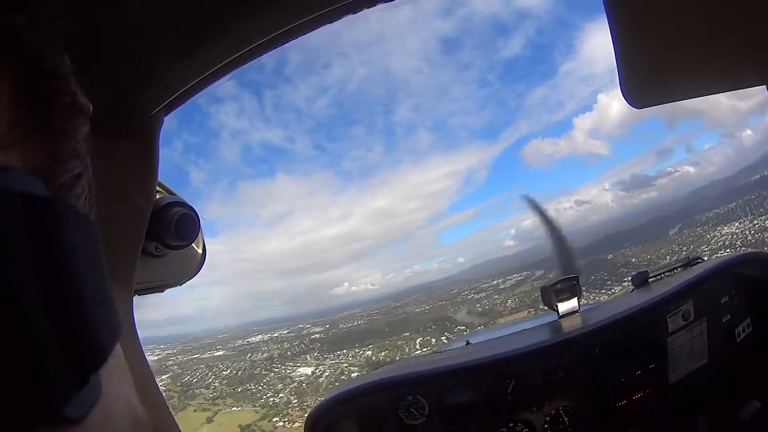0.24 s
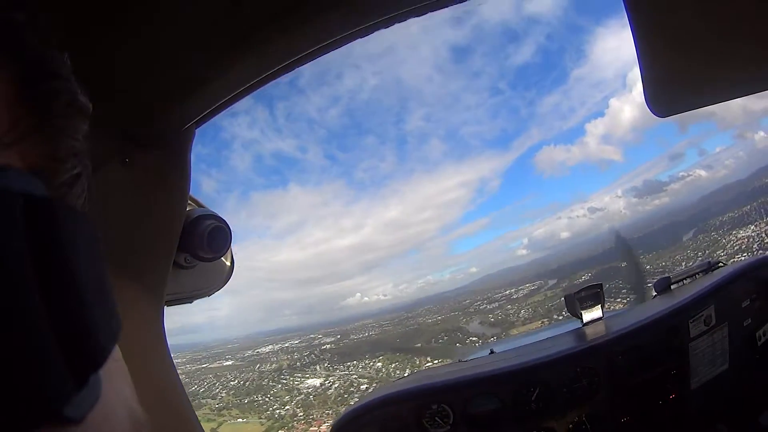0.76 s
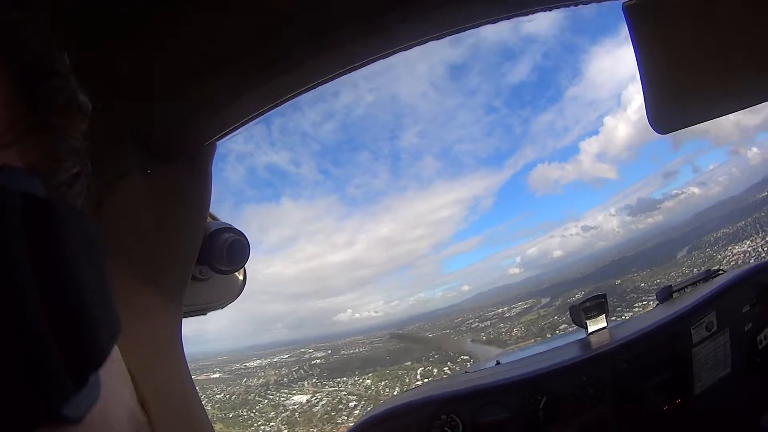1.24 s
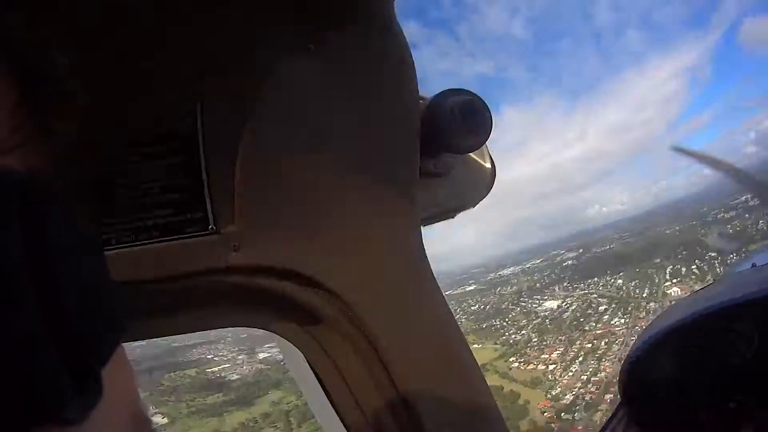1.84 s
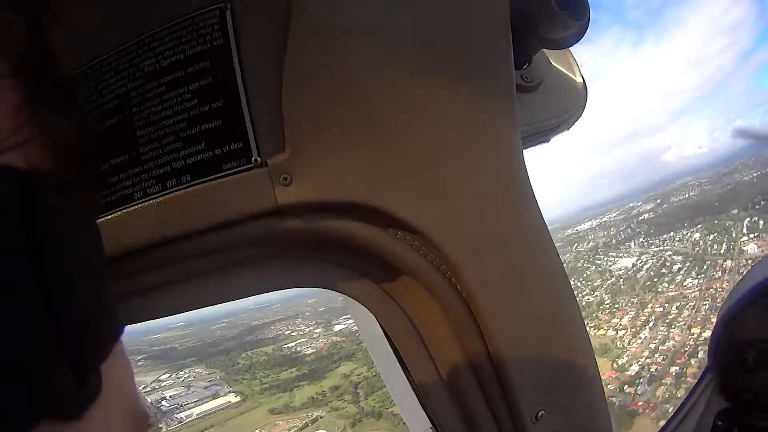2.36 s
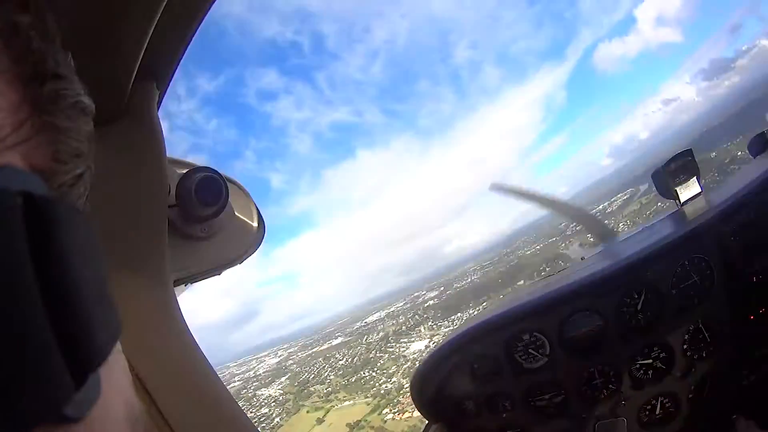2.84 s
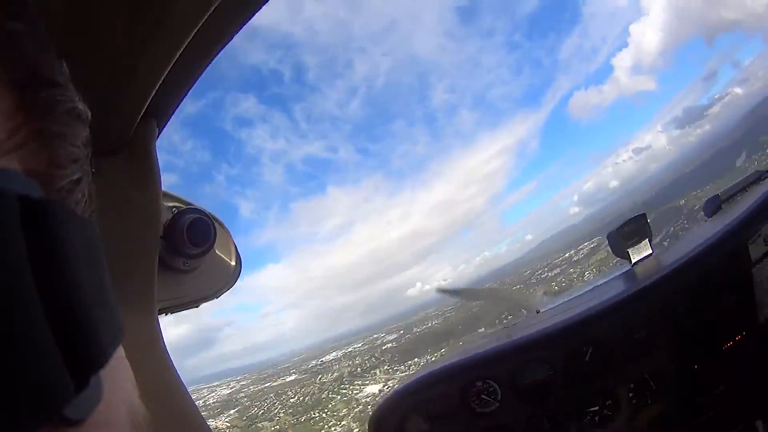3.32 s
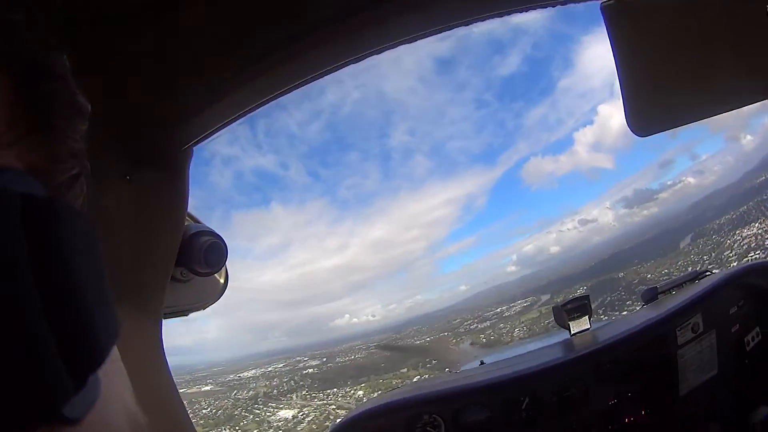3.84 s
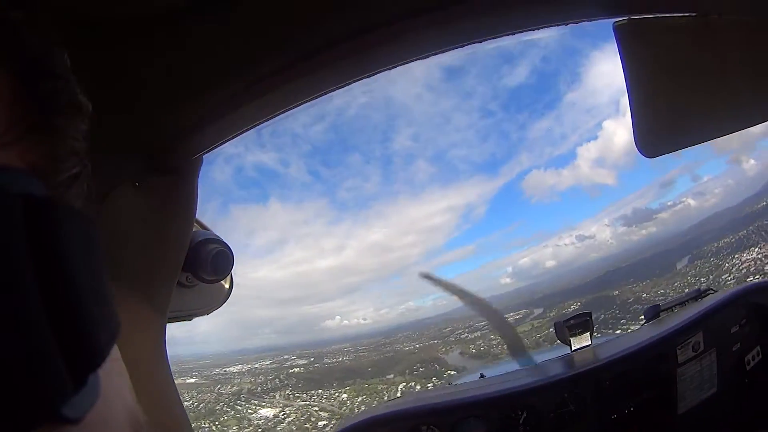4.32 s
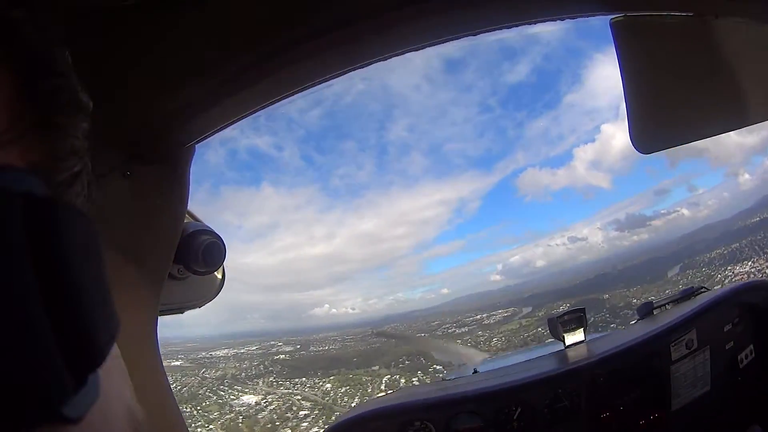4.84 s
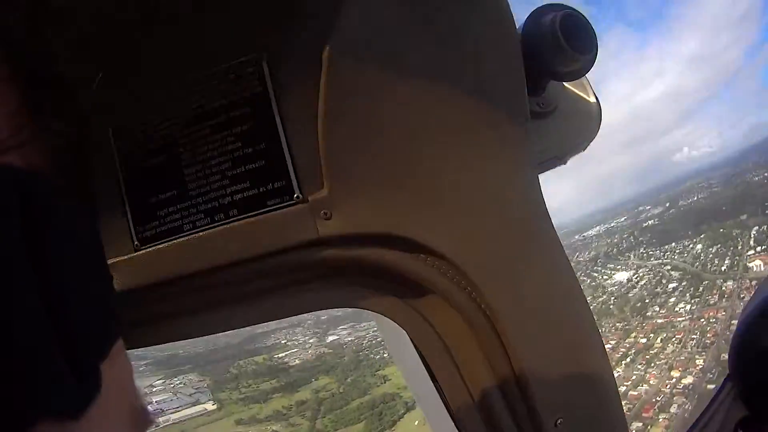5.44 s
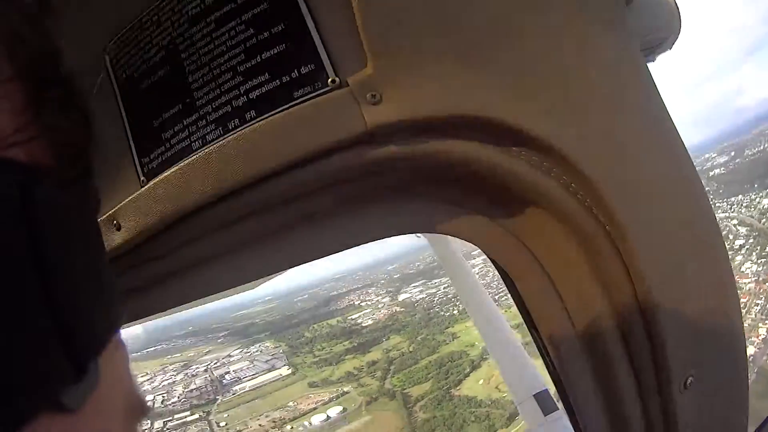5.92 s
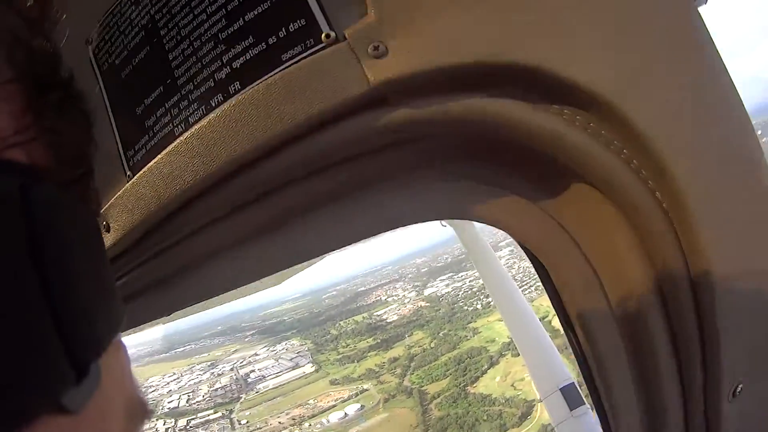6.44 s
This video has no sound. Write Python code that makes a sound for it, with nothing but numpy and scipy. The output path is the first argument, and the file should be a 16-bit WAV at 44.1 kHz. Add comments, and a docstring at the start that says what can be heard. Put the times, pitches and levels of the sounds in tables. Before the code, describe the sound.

Small aircraft intercom noise: a thin, high whine sinks slightly in pitch above steady hum, faint buzzing tones and hiss.

```python
"""A high, fluttering whine over hum and hiss: a light piston aircraft's intercom, with nobody talking.
The whine is alternator ripple near 5 kHz, shaken by every firing and sagging as the engine slows.
The voltage regulator hums in step with the firings and stumbles as the flashing lights load it.
The strobe thumps at each flash; behind it sit thin instrument tones, spells of digital buzz,
leaking cabin roar and amplifier hiss."""
import sys
import numpy as np
from scipy import signal
from scipy.fft import rfft, irfft
from scipy.io import wavfile
from scipy.ndimage import uniform_filter1d

SR = 44100
rng = np.random.default_rng(int(sys.argv[2]) if len(sys.argv) > 2 else 0)


def int16_out(signal):
    """Quantize to a 16-bit WAV file."""
    q = np.round(np.clip(np.atleast_2d(signal).T, -1, 1) * 32767)
    wavfile.write(sys.argv[1], SR, q.astype(np.int16))


N = 294147
TIME = np.arange(N) / SR

# Noise beds: cabin roar, hiss shared by both ears, and each ear's own hiss.
# Each row: frequency in Hz, level in dB per Hz.
ROAR_SPECTRUM = [(12, -80), (30, -85.5), (50, -80), (70, -76), (125, -76.5), (200, -81.5), (280, -84.5),
                 (350, -89.5), (470, -85), (570, -91), (690, -88.5), (850, -89), (1200, -98), (3000, -112)]
LINE_HISS_SPECTRUM = [(20, -86.5), (1500, -95.5), (4000, -96), (7000, -96.5), (10000, -95.5)]
EAR_HISS_SPECTRUM = [(30, -66), (100, -101), (400, -95.5), (2500, -95), (5000, -97.5), (7500, -96.5),
                     (10000, -95.5)]
# Tone of the inverter and of the display scan. Each row: harmonic number, level in dB rms.
INVERTER_PARTIALS = [(1, -62), (2, -52), (3, -69.5)]
DISPLAY_PARTIALS = [(4, -69), (6, -74), (8, -58.5), (10, -70.5), (12, -59.5), (14, -79.5), (16, -61.5),
                    (20, -63.5), (24, -67), (28, -71), (32, -76.5), (36, -79.5), (37, -80), (43, -83.5)]
# The digital unit's low buzz. Each row: harmonic number, level in dB before the spell's gain.
BUZZ_BODY = [(2, -57), (3, -62.5), (4, -64), (5, -60.5), (6, -57.5)]
# Its faint, steady top. Each row: harmonic number, level in dB rms.
BUZZ_TOP = [(7, -74.5), (9, -75), (10, -71), (11, -80), (12, -75), (14, -70.5)]
# Spells of low buzz. Each row: start in seconds, end in seconds, gain in dB.
BUZZ_SPELLS = [(0, 1.2, -1), (1.8, 2.33, -.5), (5.2, 6.67, 0.6)]
# Spells of thin tone. Each row: start in seconds, end in seconds, level in dB rms.
TONE_SPELLS = [(1.04, 1.87, -54.7), (2.15, 2.32, -54), (2.32, 5.17, -60), (5.17, 5.31, -54)]
# How hard each strobe flash in turn kicks the line, in dB.
FLASH_KICKS_DB = [-32, -36, -30, -34, -44, -29.5]
# The regulator's pulse. Each row: harmonic of the firing rate, base level in dB.
HUM_PARTIALS = [(1, -41), (2, -50.5), (3, -54.5), (4, -71), (5, -66), (6, -60), (7, -62)]
# Stumbles of the hum as the strobe recharges, and as the slightly slower beacon switches.
# Each row: time after the light fires in seconds, delay in hum cycles.
STROBE_STUMBLES = [(.14, 0.25), (0.281, .22), (.44, .18), (0.626, .25)]
BEACON_STUMBLES = [(0, .26), (.133, 0.26)]
# The crankshaft's speed ripple. Each row: harmonic of the firing rate, relative level in dB.
CRANK_RIPPLE = [(1, 0), (2, -10), (3, -9.5)]
# The whine's pitch, riding on engine speed. Each row: time in seconds, pitch in Hz.
WHINE_PITCH = [(0.05, 5063), (0.38, 5064), (1.64, 5051), (2.42, 4996), (3.31, 4819), (4.21, 4762),
               (5.65, 4731), (6.05, 4791), (6.6, 4828)]
# The whine's colour. Each row: harmonic of the stator frequency, level in dB relative to the sixth.
WHINE_PARTIALS = [(1, -30.5), (2, -25.5), (4, -24.5), (5, -51.5), (6, 0), (8, -31), (10, -45), (12, -12.5)]

FLASH_TIMES_S = np.arange(.386, N / SR, 1.2134)
BEACON_TIMES_S = np.arange(.181, N / SR, 1.2255)


def from_db(db):
    """Decibels to gain."""
    return 10 ** (np.asarray(db) / 20)


def drift(corner_hz):
    """A random wobble of spread 1, with little movement above corner_hz."""
    hz = np.arange(N // 2 + 1) * SR / N
    slow = irfft(rfft(rng.standard_normal(N)) / (1 + (hz / corner_hz) ** 2), N)
    return slow / slow.std()


def noise(spectrum):
    """Noise shaped to the given level per Hz."""
    points = np.array(spectrum)
    hz = np.maximum(np.arange(N // 2 + 1) * SR / N, 1)
    level_db = np.interp(np.log(hz), np.log(points[:, 0]), points[:, 1])
    return irfft(rfft(rng.standard_normal(N)) * from_db(level_db), N) * np.sqrt(SR / 2)


def turning(hz):
    """Phase of something that turns at hz, from a random start."""
    return 2 * np.pi * (np.cumsum(hz * np.ones(N)) / SR + rng.random())


def partials(phase, table, scatter=1):
    """Harmonics of a phase: scatter 0 lines them up as pulses, 1 smears them into a buzz."""
    return np.sqrt(2) * sum(from_db(db) * np.cos(round(k) * phase + scatter * rng.uniform(-np.pi, np.pi))
                            for k, db in table)


def impulses(times, sizes):
    """One click for each event."""
    clicks = np.zeros(N)
    inside = (times >= 0) & (times < TIME[-1])
    clicks[(times[inside] * SR).astype(int)] = (sizes * np.ones(len(times)))[inside]
    return clicks


def fader(spells, idle_db, ramp_s):
    """A gain that rests at idle_db and ramps to each spell's level."""
    gain = np.full(N, from_db(idle_db))
    for start, end, db in spells:
        gain[(TIME >= start) & (TIME < end)] = from_db(db)
    return uniform_filter1d(gain, size=int(ramp_s * SR))


def knocks(kicks, hz, t60_s):
    """Each kick sets off a short, damped ring."""
    decay, step = from_db(-60 / (t60_s * SR)), 2 * np.pi * hz / SR
    return signal.lfilter([0, np.sin(step)], [1, -2 * decay * np.cos(step), decay ** 2], kicks + 1e-18)


def amplifier_hiss():
    """The noise floor: hiss on the shared line, and a separate stereo pair for the ears."""
    return noise(LINE_HISS_SPECTRUM), np.array([noise(EAR_HISS_SPECTRUM), noise(EAR_HISS_SPECTRUM)])


def cabin_roar(hum, pulsing=0.19):
    """Cabin roar leaks into the line and swells with each pulse of the hum."""
    return noise(ROAR_SPECTRUM) * (1 + pulsing * hum / hum.std())


def instruments(inverter_hz=398.7, scan_hz=82.37, odd_db=-76, waver_db=-0.1):
    """The inverter sings steadily; the display scan buzzes, weak odd partials between its strong ones."""
    inverter = partials(turning(inverter_hz), INVERTER_PARTIALS) * from_db(waver_db * drift(7.4))
    scan = turning(scan_hz)
    odd_partials = [(k, odd_db) for k in range(9, 34, 2)]
    return inverter + partials(scan, DISPLAY_PARTIALS) + partials(scan, odd_partials)


def digital_unit(clock_hz=128.1, switch_s=0.12, octave_db=-3, octave_limit_db=-64.5):
    """As its load changes, the low buzz gives way to a thin tone with a faint octave, then returns."""
    clock = turning(clock_hz)
    body_gain = fader(BUZZ_SPELLS, idle_db=-11.5, ramp_s=switch_s)
    buzz = body_gain * partials(clock, BUZZ_BODY) + partials(clock, BUZZ_TOP)
    tone_gain = fader(TONE_SPELLS, idle_db=-70, ramp_s=switch_s)
    octave_gain = np.minimum(tone_gain * from_db(octave_db), from_db(octave_limit_db))
    return buzz + tone_gain * partials(clock, [(8, 0)]) + octave_gain * partials(clock, [(16, 0)])


def strobe_thumps(tick_db=-7.0):
    """Each flash pulls the supply down, with a thud and a short tick."""
    kicks = impulses(FLASH_TIMES_S, from_db(FLASH_KICKS_DB))
    thud = knocks(kicks, hz=110, t60_s=0.045)
    tick = knocks(kicks, hz=290, t60_s=0.018)
    return -thud - from_db(tick_db) * tick


def stumbles(scatter_s=.004, size_spread=0.22, advance_cycles=0.26, catch_up_s=0.061):
    """The hum's lag in cycles: the lights make the regulator slip, and each time it is drawn back."""
    lights = (FLASH_TIMES_S, STROBE_STUMBLES), (BEACON_TIMES_S, BEACON_STUMBLES)
    times, cycles = np.transpose([(start + after, delay) for starts, pattern in lights
                                  for start in starts for after, delay in pattern])
    late, harder = rng.standard_normal((len(times), 2)).T
    slips = impulses(times + scatter_s * late, cycles * (1 + size_spread * harder))
    slips -= impulses(FLASH_TIMES_S, advance_cycles)   # the flash itself makes it fire early
    lag = signal.lfilter([1], [1, -np.exp(-1 / (catch_up_s * SR))], slips + 1e-18)
    return uniform_filter1d(lag, size=400)   # a slip stretches one cycle


def regulator_hum(firing, sag_hz, wander_cycles=0.024, unevenness=0.022, db_per_sag_hz=0.0011):
    """The field switch pulses in step with the firings, a touch louder as the engine slows."""
    lag = stumbles() + wander_cycles * drift(27)
    pulses = partials(firing - 2 * np.pi * lag, HUM_PARTIALS, scatter=0)
    return pulses * (1 + unevenness * drift(27)) * from_db(db_per_sag_hz * sag_hz)


def engine_flutter(ripple_hz, sag_hz, firing, flutter_hz=18, belt_hz=6.0, jitter_hz=6.24):
    """The whine's pitch, shaken by the belt and by each firing, harder as the engine slows."""
    shake = (flutter_hz + 0.029 * sag_hz) * partials(firing, CRANK_RIPPLE, scatter=0)
    belt = np.sin(turning(ripple_hz / 150))
    return ripple_hz - shake + belt_hz * belt + jitter_hz * drift(243)


def alternator_whine(pitch_hz, hum, base_db=-36.5, recharge_s=.625,
                     field_depth=0.06, rotor_depth=0.04, shimmer=0.028):
    """Three rectified phases give six ripples a stator cycle; the strobe's recharge lifts the level."""
    recharges = [(flash, flash + recharge_s, 1.3) for flash in FLASH_TIMES_S]   # gain in dB
    load = fader(recharges, idle_db=0.5, ramp_s=0.11)
    stator = turning(pitch_hz / 6)
    rotor = stator / 6   # six slightly unequal pole pairs sway the level once a turn
    field = signal.sosfilt(signal.butter(1, 110, fs=SR, output="sos"), hum)   # smoothed by the winding
    strength = 1 + field_depth * field / field.std() + rotor_depth * np.sin(rotor) + shimmer * drift(68)
    return from_db(base_db) * load * strength * partials(stator, WHINE_PARTIALS)


def scene(ripples_per_firing=61.79):
    """Everything meets on one mono line; each ear adds a little hiss of its own."""
    ripple_hz = np.interp(TIME, *np.transpose(WHINE_PITCH))
    sag_hz = ripple_hz.max() - ripple_hz
    firing = turning(ripple_hz / ripples_per_firing)
    hum = regulator_hum(firing, sag_hz)
    whine = alternator_whine(engine_flutter(ripple_hz, sag_hz, firing), hum)
    line = hum + whine + instruments() + digital_unit() + strobe_thumps() + cabin_roar(hum)
    line_hiss, ear_hiss = amplifier_hiss()
    return (line + line_hiss) * from_db([[-.08], [.08]]) + ear_hiss


def record(dry, coupling_hz=41, edge_hz=9750, cutoff_hz=10250):
    """A coupling capacitor thins the sub-bass; the top rolls off at the whine's octave, then is cut."""
    coupled = signal.sosfilt(signal.butter(2, coupling_hz, "high", fs=SR, output="sos"), dry)
    rolled = signal.sosfilt(signal.butter(14, edge_hz, fs=SR, output="sos"), coupled)
    return signal.sosfilt(signal.ellip(10, .05, 80, cutoff_hz, fs=SR, output="sos"), rolled)


dry = scene()
out = record(dry)
int16_out(out)
```